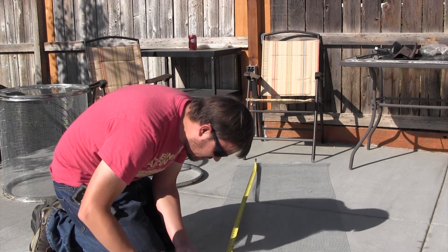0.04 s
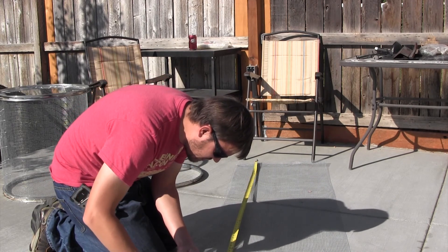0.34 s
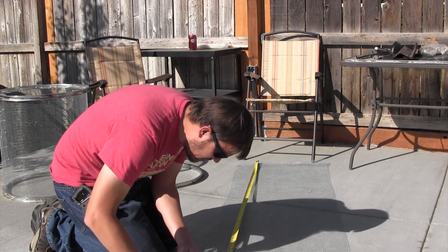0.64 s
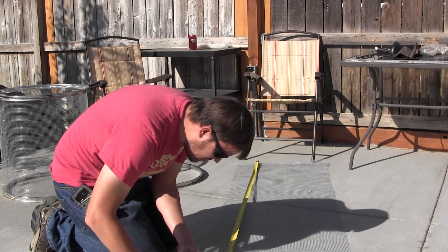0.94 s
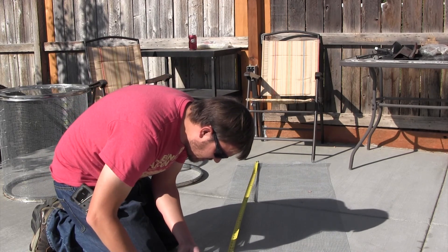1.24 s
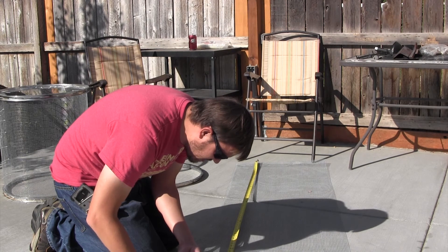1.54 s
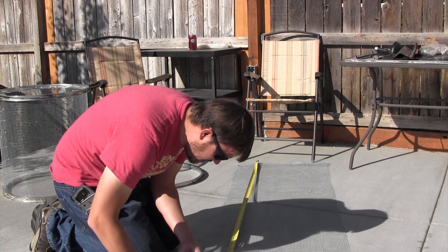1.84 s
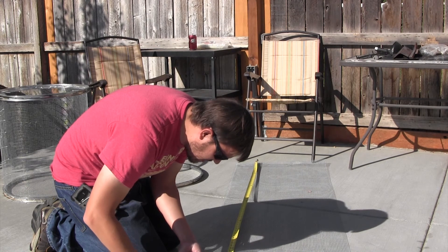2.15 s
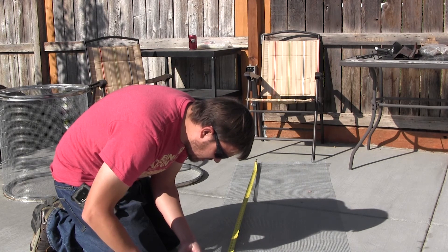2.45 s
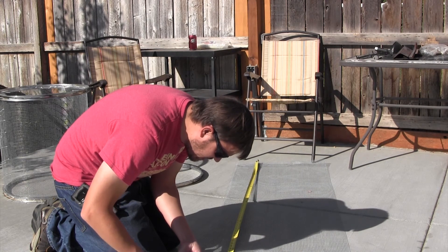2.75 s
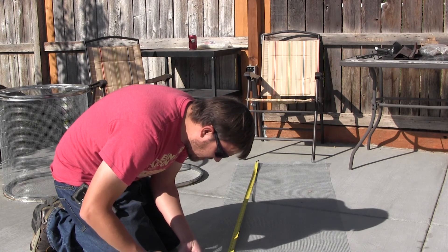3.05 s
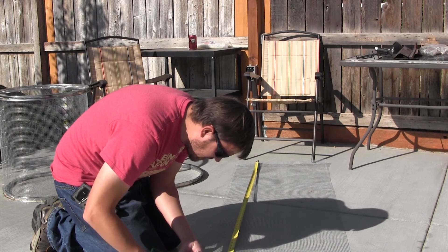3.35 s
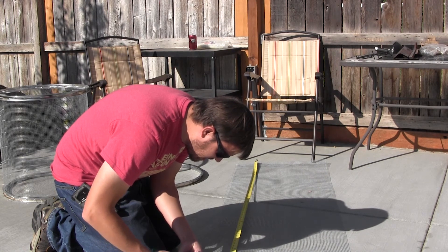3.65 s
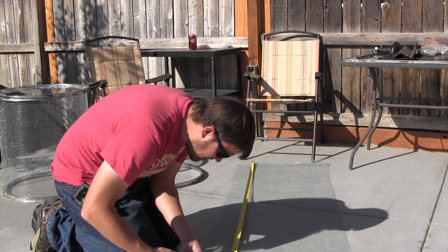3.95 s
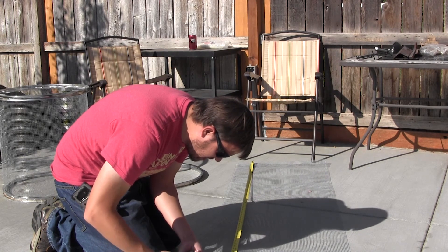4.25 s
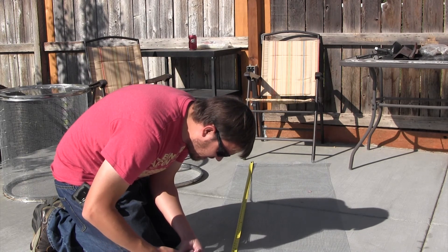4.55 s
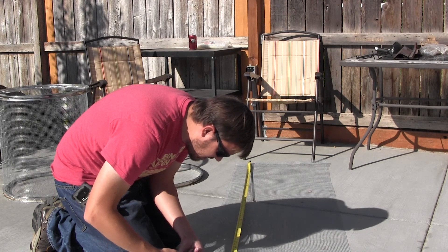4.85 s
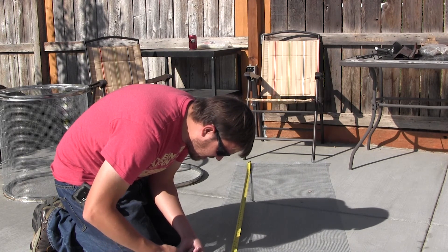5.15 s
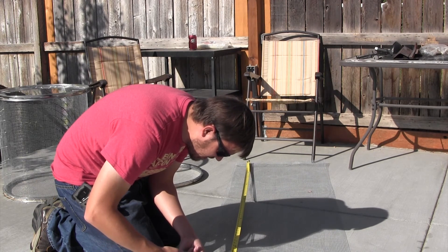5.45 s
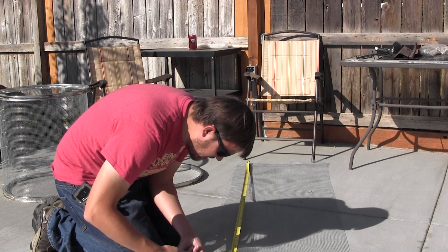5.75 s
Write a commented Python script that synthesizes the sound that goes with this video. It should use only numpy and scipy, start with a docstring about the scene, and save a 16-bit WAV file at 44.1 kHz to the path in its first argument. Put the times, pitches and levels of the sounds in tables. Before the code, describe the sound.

Faint distant traffic hums throughout on an outdoor patio. From the start, a sheet of wire mesh gives light, thin rattles as it is pressed and shifted. At about 1.5 seconds tin snips make one soft cut with a brief fizz. Two sharp metallic snips follow at 2.8 and 3 seconds, each a crack of wire with a short shiver of the sheet. The jaws click shut at 3.2 seconds and the blades scrape. At 3.8 seconds the tool knocks hard on the concrete, by far the loudest sound, and everything dips slightly in level afterwards. More crisp snips come at about 3.9, 4.5, 5 and 5.6 seconds, with gritty scrapes along the cut edge and small rattles between them until the end near 6 seconds. The work is straight ahead, with a very short echo from a wall.

```python
"""Tin snips cutting wire mesh on a concrete patio

Each wire parts with a crack and the sheet shivers; the blades open and scrape along the cut edge.
Once the tool knocks hard on the slab. A wall echoes and distant traffic hums.
A limiter ducks at the knock and slowly recovers."""
import sys
import numpy as np
from scipy import signal
from scipy.fft import rfft, irfft, next_fast_len
from scipy.io import wavfile
from scipy.ndimage import uniform_filter1d, minimum_filter1d, map_coordinates

SR = 44100
rng = np.random.default_rng(int(sys.argv[2]) if len(sys.argv) > 2 else 0)


def wav_out(sig):
    """Save sig, one row per channel (or a flat mono array), as 16-bit PCM at SR to the path in sys.argv[1]."""
    wavfile.write(sys.argv[1], SR, np.round(np.clip(np.atleast_2d(sig).T, -1, 1) * 32767).astype(np.int16))


N = 260013

# wire cuts: (time [s], crack [dB], bite [Hz], relative blade ring [dB], buzz [dB], mesh shiver [dB])
CUTS = [(1.5027, -39, 4250, -58, -51, -39.5), (2.7694, -22, 4300, -33, -23, -27.5),
        (3.0029, -23, 4300, -23, -23.5, -26.5), (3.916, -21.5, 4200, -21.5, -30, -32),
        (4.524, -18.5, 5250, -16.5, -25, -26), (5.049, -18, 5000, -19.5, -29.5, -27),
        (5.6411, -23.5, 5240, -21.5, -27, -26.5)]
# tool hits the slab, then settles: (time [s], level [dB], mesh shiver [dB], echo [dB], low-pass [Hz])
KNOCKS = [(3.805, -3, -19.5, -9.5, 14000), (3.873, -23, -31, -7, 1500)]
# blade strokes along the cut edge: (start [s], end [s], level [dB])
STROKES = [(2.217, 2.277, -57), (2.763, 2.916, -37), (3.23, 3.445, -38.5), (3.848, 3.996, -34),
           (4.209, 4.327, -37.5), (4.594, 4.664, -44.5), (4.775, 4.938, -38.5), (5.057, 5.134, -43),
           (5.328, 5.494, -39.5), (5.864, 5.95, -43)]


def amp(db):
    """Decibels to gain."""
    return 10 ** (np.asarray(db) / 20)


def unit(x):
    """Scale to rms 1."""
    return x / np.sqrt(np.mean(x ** 2) + 1e-20)


def unit_hit(x):
    """Scale to the energy of 4 ms at rms 1."""
    return x * np.sqrt(.004 * SR / np.sum(x ** 2))


def seconds(length_s):
    """Time axis."""
    return np.arange(int(length_s * SR)) / SR


def add(track, at_s, sound):
    """Mix a sound into the track."""
    part = track[max(round(at_s * SR), 0):][:len(sound)]
    part += sound[:len(part)]


def along(points, hz):
    """Interpolate (frequency [Hz], value) points on a log axis."""
    knots_hz, values = np.transpose(points)
    return np.interp(np.log(hz + 1), np.log(knots_hz + 1), values)


def filtered(x, response):
    """Apply a complex frequency response."""
    n = x.shape[-1]
    size = next_fast_len(n + SR // 4)
    return irfft(rfft(x, size) * response(np.fft.rfftfreq(size, 1 / SR)), size)[..., :n]


def coloured(x, spectrum, size=2048):
    """Minimum-phase filter through (frequency [Hz], gain [dB]) points."""
    cepstrum = irfft(np.log(amp(along(spectrum, np.fft.rfftfreq(size, 1 / SR)))))
    cepstrum[1:size // 2] *= 2
    cepstrum[size // 2 + 1:] = 0
    return signal.fftconvolve(x, irfft(np.exp(rfft(cepstrum))))[:len(x)]


def resonant(x, modes):
    """Parallel resonances of alternating sign: (centre [Hz], width [Hz], gain [dB])."""
    return filtered(x, lambda f: sum(
        (-1) ** k * amp(db) * 1j * f * width / (hz * hz - f * f + 1j * f * width)
        for k, (hz, width, db) in enumerate(modes)))


def wobble(knots_per_s):
    """Smooth random curve."""
    knots = rng.standard_normal(int(N * knots_per_s / SR) + 4)
    return map_coordinates(knots, [np.arange(N) * knots_per_s / SR])


def burst(rise_s, t60_s):
    """Noise that builds until the material gives, then dies."""
    t = seconds(.1)
    decay = amp(-60 * np.maximum(t - rise_s, 0) / t60_s)
    return rng.standard_normal(len(t)) * np.minimum(t / rise_s, 1) * decay


def dying(at_s, db, t60_s, rise_s=.00073):
    """Envelope: linear rise, exponential decay."""
    level, t = np.zeros(N), seconds(t60_s)
    add(level, at_s, np.minimum(t / rise_s, 1) * amp(db - 60 * t / t60_s))
    return level


def contacts(per_s, spread_db, t60_s):
    """Many tiny wire contacts, each a puff of noise."""
    sizes = (rng.random(N) < per_s / SR) * amp(spread_db * np.clip(rng.standard_normal(N), -2, 2))
    power = signal.fftconvolve(sizes ** 2, amp(-60 * seconds(.1) / t60_s) ** 2)[:N]
    return unit(np.sqrt(np.abs(power)) * rng.standard_normal(N))


def flurry(per_s, t60_s):
    """Envelope, rms 1, of small decaying jerks at uneven intervals."""
    count = int(per_s * N / SR)
    jitter, size = rng.random((count, 2)).T
    onsets = ((np.arange(count) + jitter) * N / count).astype(int)
    jerks = np.bincount(onsets, size ** 2, N)
    power = signal.fftconvolve(jerks, amp(-60 * seconds(t60_s) / t60_s) ** 2)[:N]
    return unit(np.sqrt(np.abs(power)))


def stroke_speed():
    """Half-sine envelope: each stroke speeds up and slows down."""
    t = np.arange(N) / SR
    return sum(amp(db) * np.sin(np.pi * np.clip((t - start_s) / (end_s - start_s), 0, 1))
               for start_s, end_s, db in STROKES)


def traffic():
    """Distant traffic, slightly right: road rush, wavering engine drone, one receding vehicle."""
    spectrum = [(15, -34), (25, -21), (130, -5.5), (256, -12), (394, -14.5), (503, -12.5), (754, -15.5),
                (818, -13.5), (1130, -18.5), (1650, -21), (2160, -25), (2690, -26), (3520, -28.5),
                (10400, -35), (16000, -39)]  # road rush: (frequency [Hz], relative density [dB])
    coherence = [(25, 0.43), (100, 0.99), (280, 0.63), (600, 0.69), (1500, 0.75), (4000, 0.68),
                 (12000, 0.31)]  # (frequency [Hz], left-right correlation [1])

    def mid_side(hz):
        angle = np.arccos(np.clip(along(coherence, hz), -1, 1)) / 2
        return amp(along(spectrum, hz)) * [np.cos(angle), np.sin(angle)]

    mid, side = filtered(rng.standard_normal((2, N)), mid_side)
    rush = unit(np.array([mid + side, mid - side])) * amp(.73 * wobble(4.71))
    engine_modes = [(117.9, 7.4, -1.5), (145.3, 4.4, -8.5), (86, 19, -15.5)]
    drone = unit(resonant(rng.standard_normal(N), engine_modes))
    receding = dying(0, db=-46.5, t60_s=6) * unit(resonant(rng.standard_normal(N), [(218, 106, 0)]))
    return rush * amp([[-48], [-46]]) + drone * amp([[-54], [-51]]) + receding * amp([[-2], [0]])


def patio_scatter(x):
    """Short tail from fence and furniture, different in each channel."""
    decay = [(200, 0.58), (2000, 0.25), (12000, 0.31)]  # tail: (frequency [Hz], t60 [s])
    hz, t, noise = signal.stft(rng.standard_normal((2, SR // 3)), SR, nperseg=256)
    tail = signal.istft(noise * amp(-60 * t / along(decay, hz)[:, None]), SR, nperseg=256)[1]
    return signal.fftconvolve(x[None], tail / np.linalg.norm(tail[0]), axes=1)[:, :N]


def wall_echo(hit, db, delay_s=.015, dull_hz=6500):
    """A hit plus its duller return from the wall."""
    echo = filtered(hit, lambda f: np.exp(-2j * np.pi * f * delay_s) / (1 + (f / dull_hz) ** 2))
    return hit + amp(db) * echo


def scraping():
    """Steel drags over wire ends with a gritty hiss, catching at the start and at random after."""
    spectrum = [(300, -24), (1000, -9), (2400, -16), (3100, -2), (5000, -6.5), (9000, -8.5), (12500, -10.5),
                (16000, -17.5)]  # blade hiss: (frequency [Hz], gain [dB])
    grabs = sum(dying(start_s + .0038, db - 3.5, t60_s=.089, rise_s=.00082)
                for start_s, _, db in STROKES)
    sliding = stroke_speed() * np.hypot(1, amp(-9) * flurry(per_s=33, t60_s=.089))
    grit = contacts(per_s=800, spread_db=4.5, t60_s=.024)
    # the first, light cut ends in a thin fizz
    thin_grit = unit(coloured(grit, [(6000, -27), (11000, 0), (15000, 4)]))
    fizz = dying(CUTS[0][0], db=-39, t60_s=.17) * thin_grit
    return fizz + (sliding + grabs) * unit(coloured(grit, spectrum))


def mesh(settle_s=.024):
    """The sheet rattles when it slips or is cut, struck, pressed by hand or dragged by the blades."""
    slips = [(0, -32.5), (.141, -40.5), (.2, -43), (.541, -47.5), (.663, -41.5), (.716, -43.5),
             (.776, -43.5), (1.294, -50), (2.238, -42.5), (3.104, -39.5), (3.188, -44.5), (3.561, -36.5),
             (3.727, -49.5), (4.004, -33.5), (4.62, -39), (4.745, -46.5)]  # sheet slips: (time [s], level [dB])
    presses = [(0.312, 1.097, -55), (2.45, 2.6, -58.5), (3.673, 3.79, -47.5), (4.65, 5.047, -51.5),
               (5.543, 5.638, -53.5)]  # hand on the sheet: (start [s], end [s], level [dB])
    spectrum = [(400, -35), (1200, -12), (2650, -11), (3000, -3), (3400, -1), (4100, -1), (5000, -9.5),
                (5900, -21), (6800, -10), (8500, -14), (12000, -16.5), (16000, -25)]  # rattle: (frequency [Hz], gain [dB])
    strand_modes = [(3090, 370, -1.5), (3320, 82, 4), (4390, 440, -11.5), (5563, 240, -4), (6360, 110, -6),
                    (9600, 210, -23.5), (11100, 230, -18)]  # (centre [Hz], width [Hz], gain [dB])
    t = np.arange(N) / SR
    slipped = sum(dying(at_s, db, t60_s=.36) ** 2 for at_s, db in slips)
    cut = sum(dying(at_s, db, t60_s=.33, rise_s=.016) ** 2 for at_s, *_, db in CUTS)
    struck = sum(dying(at_s, db, t60_s=.32) ** 2 for at_s, _, db, _, _ in KNOCKS)
    pressure = sum(amp(db) * ((t > start_s) & (t < end_s)) for start_s, end_s, db in presses)
    stirred = (uniform_filter1d(pressure, SR // 50) * flurry(per_s=50, t60_s=.25)) ** 2
    leak = 1 / (settle_s * SR)  # stored stroke energy drains away
    dragged = signal.lfilter([leak], [1, leak - 1], stroke_speed() ** 2)
    touches = contacts(per_s=660, spread_db=0, t60_s=.029)
    rattle = unit(coloured(touches, spectrum))
    # clusters of narrow modes; other strands ring as the sheet bends
    cluster = np.zeros(N)
    for _ in range(3):
        bend_db = 7.4 * wobble(4.93)
        cluster += amp(bend_db) * signal.fftconvolve(touches, burst(rise_s=.00075, t60_s=.11))[:N]
    cluster /= np.sqrt(np.abs(uniform_filter1d(cluster ** 2, SR // 20)) + 1e-12)
    ring = unit(resonant(coloured(cluster, [(2550, -26), (2950, -5.5)]), strand_modes))
    return np.sqrt(slipped + cut + struck + stirred + dragged) * unit(rattle + amp(-3) * ring)


def jaw_click():
    """The jaws shut on no wire: a dry steel tick and a brief ring."""
    closures = [(3.2357, -20.5, -11)]  # (time [s], level [dB], echo [dB])
    jaw_modes = [(4340, 93, -6.5), (6800, 410, -8), (8140, 170, -11), (9300, 160, -19), (11500, 860, -12),
                 (15700, 270, -21)]  # (centre [Hz], width [Hz], gain [dB])
    spectrum = [(800, -14), (2800, -7), (4000, 6.5), (7000, -6), (11000, -1), (16000, -12)]
    out = np.zeros(N)
    for at_s, db, echo_db in closures:
        tick = unit_hit(coloured(burst(rise_s=.00046, t60_s=.0047), spectrum))
        ring = unit_hit(resonant(burst(rise_s=.0007, t60_s=.0018), jaw_modes))
        add(out, at_s, wall_echo(amp(db) * unit_hit(tick + 1.04 * ring), echo_db, dull_hz=5000))
    return out


def slab_knocks(lead_s=.004):
    """A gritty first touch, then the full blow of the tool on concrete."""
    modes = [(415, 200, 0.5), (525, 216, 3), (854, 143, -2.5), (1200, 59, -1), (1537, 230, -1.5),
             (2370, 250, -3), (3030, 220, -11), (3840, 220, -1.5), (4500, 170, 5), (6840, 240, -7),
             (8180, 300, -10), (9330, 200, -10), (11000, 1000, -17)]  # tool on slab: (centre [Hz], width [Hz], gain [dB])
    out = np.zeros(N)
    for at_s, db, _, echo_db, corner_hz in KNOCKS:
        force = burst(rise_s=lead_s, t60_s=.034) / 20
        add(force, lead_s, np.ones(1))  # the blow: one impulse
        force = filtered(force, lambda f: 1 / (1 + 1j * f / corner_hz))
        thud = unit_hit(coloured(resonant(force, modes), [(150, -26), (300, -9.5), (380, -5)]))
        add(out, at_s - lead_s, wall_echo(amp(db) * thud, echo_db, delay_s=1 / 70, dull_hz=11000))
    return out


def wire_cuts():
    """A wire cracks, the blades ring, the freed ends twang and buzz against the steel."""
    spectrum = [(300, -45), (750, -11), (1150, -1.5), (1700, -10), (2200, 3), (2600, -7), (3400, 1.5),
                (5000, 1), (6400, -3), (9000, 0.5), (10300, -5), (12500, -4.5), (16000, -17)]  # parting wire: (frequency [Hz], gain [dB])
    blade_modes = [(1277, 16, 0.026), (1130, -9, 0.015), (1900, -15, 0.0098), (3120, 22, 0.013),
                   (5500, -7, 0.078)]  # (frequency [Hz], relative level [dB], t60 [s])
    out, t = np.zeros(N), seconds(.1)
    for at_s, crack_db, bite_hz, ring_db, buzz_db, _ in CUTS:
        crack = unit_hit(coloured(burst(rise_s=.00079, t60_s=.021), spectrum))
        bite = unit_hit(resonant(burst(rise_s=.0014, t60_s=.0067), [(bite_hz, 380, 0)]))
        add(out, at_s, wall_echo(amp(crack_db) * unit_hit(crack + .78 * bite), db=-17))
        ring = np.zeros(len(t))
        for hz, db, t60_s in blade_modes:
            decay = amp(db + rng.normal(0, 1.3) - 60 * t / t60_s)
            ring += decay * np.sin(2 * np.pi * hz * rng.normal(1, .012) * t)
        ring = unit_hit(ring * (1 - np.exp(-t / .0002)))
        # flat blades radiate mostly towards the wall
        add(out, at_s, wall_echo(amp(ring_db - 8) * ring, db=5.5))
        stub_modes = [(bite_hz, 700, 0), (1.47 * bite_hz, 1100, -2)]
        twang = unit_hit(resonant(burst(rise_s=.0018, t60_s=.15), stub_modes))
        add(out, at_s, amp(buzz_db) * twang)
    buzz_level = sum(dying(at_s, db, t60_s=.13) for at_s, *_, db, _ in CUTS)
    buzz = unit(coloured(contacts(per_s=5100, spread_db=10.5, t60_s=.015), spectrum))
    return out + buzz_level * buzz


def scene():
    """The work straight ahead, traffic all around."""
    hits = wire_cuts() + jaw_click() + slab_knocks()
    sheet = mesh() + scraping()
    direct = (hits + sheet) * amp([[-.2], [.2]])
    return direct + patio_scatter(amp(-15.5) * hits + amp(-29) * sheet) + traffic()


def record(dry, ceiling_db=-12, release_db_per_s=1.5, top_hz=15900):
    """Limiter with fast attack and slow release, then a band limit."""
    window = SR // 250
    level_db = 10 * np.log10(np.abs(uniform_filter1d(np.mean(dry ** 2, axis=0), window)) + 1e-12)
    needed_db = minimum_filter1d(np.minimum(ceiling_db - level_db, 0), window)
    recovery_db = release_db_per_s * np.arange(N) / SR
    gain_db = uniform_filter1d(np.minimum.accumulate(needed_db - recovery_db) + recovery_db, window)
    return filtered(dry * amp(gain_db), lambda hz: hz < top_hz)


dry = scene()
out = record(dry)
wav_out(out)
```